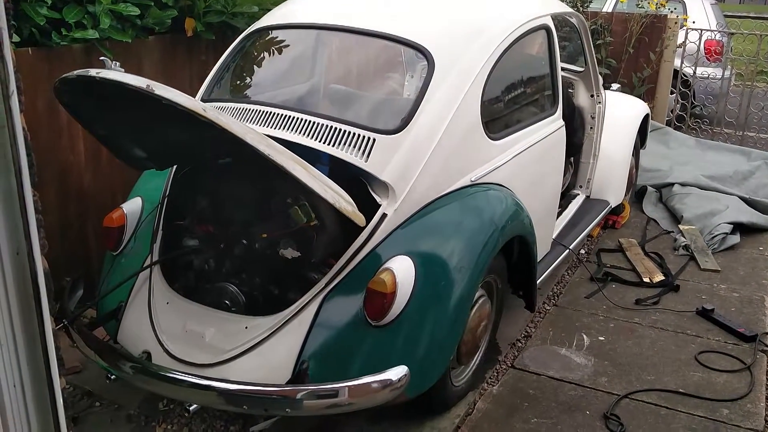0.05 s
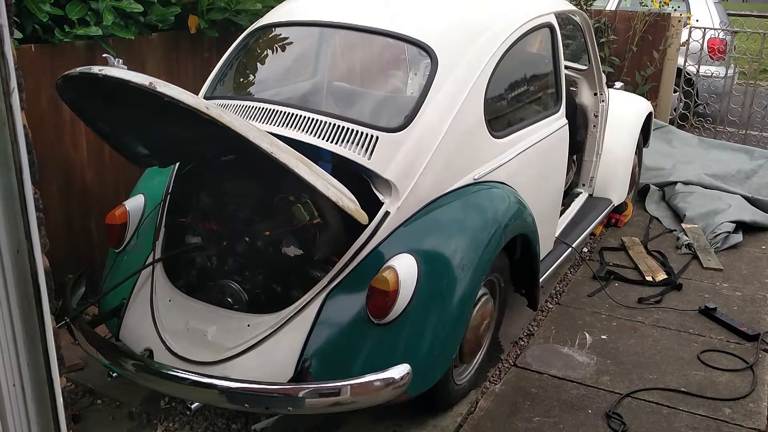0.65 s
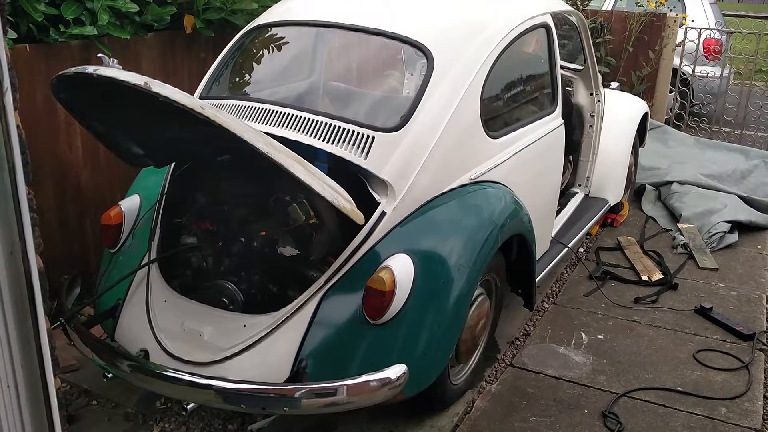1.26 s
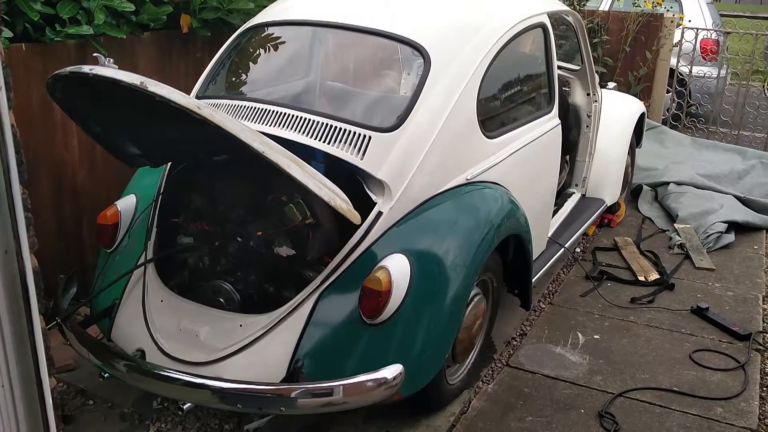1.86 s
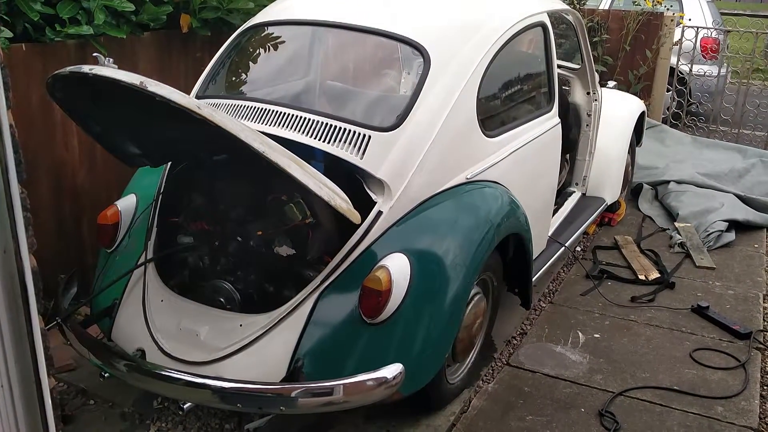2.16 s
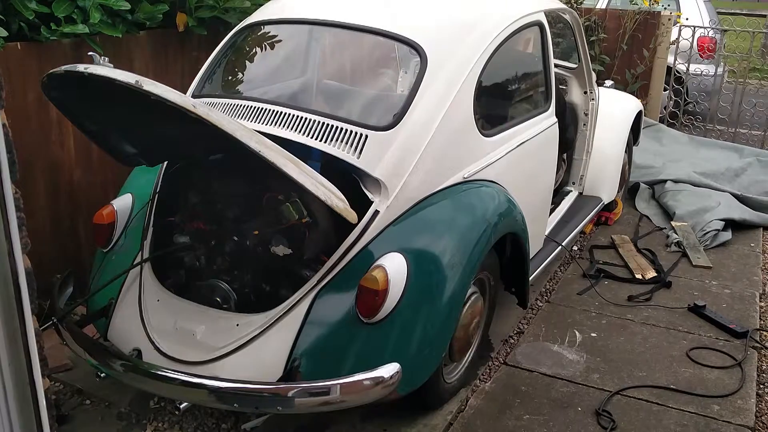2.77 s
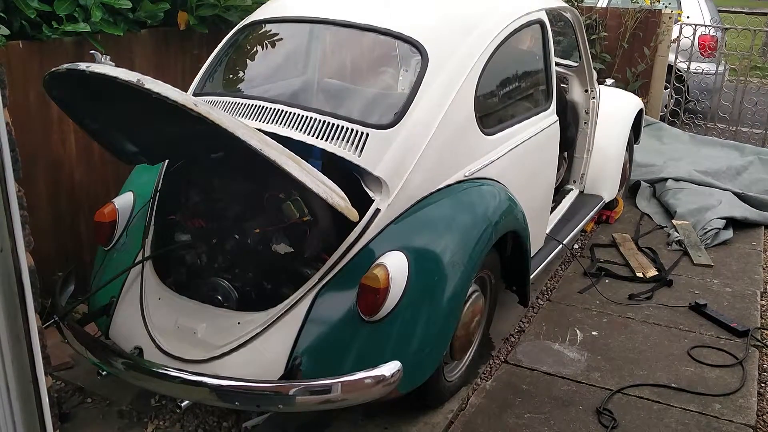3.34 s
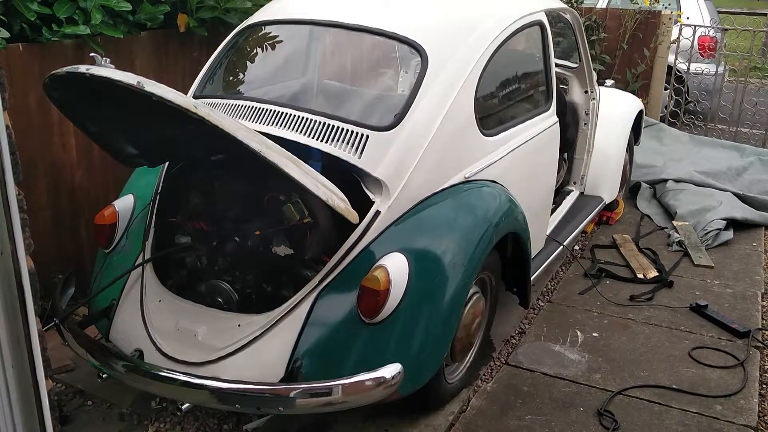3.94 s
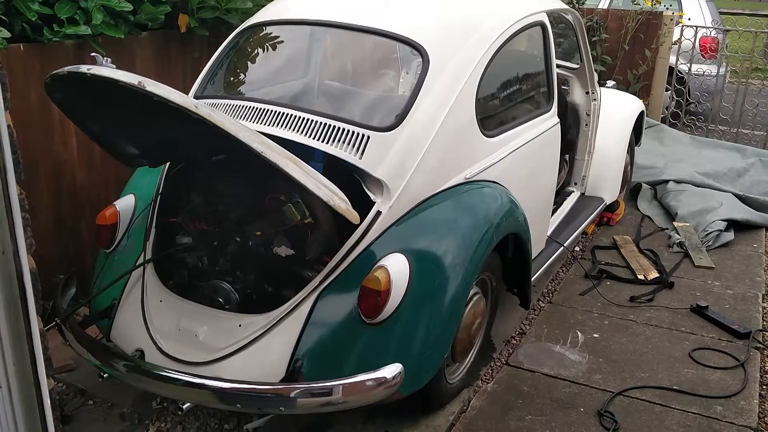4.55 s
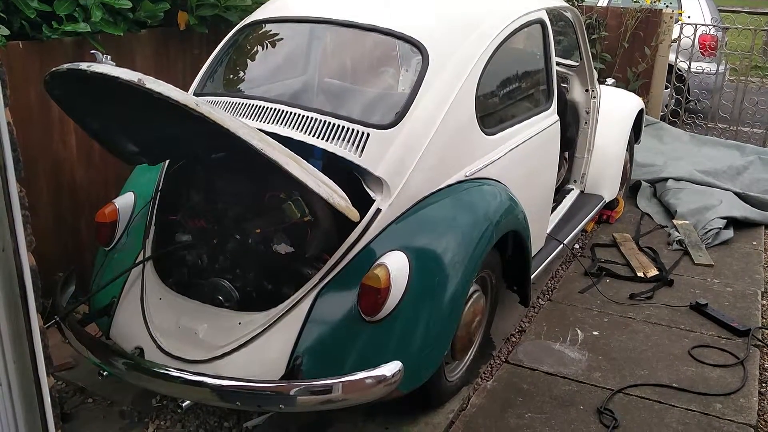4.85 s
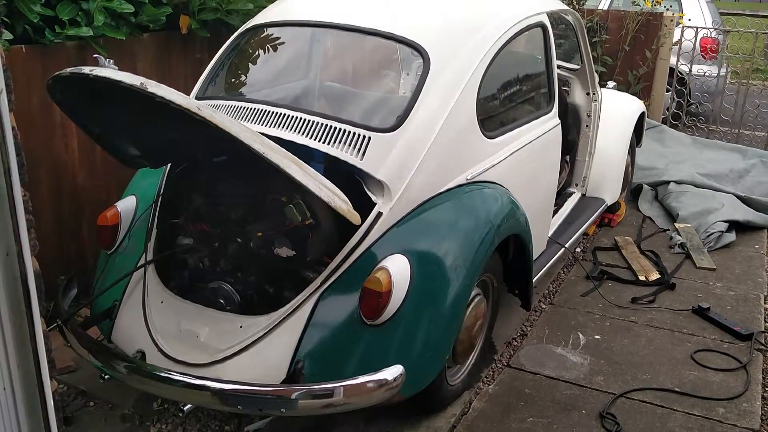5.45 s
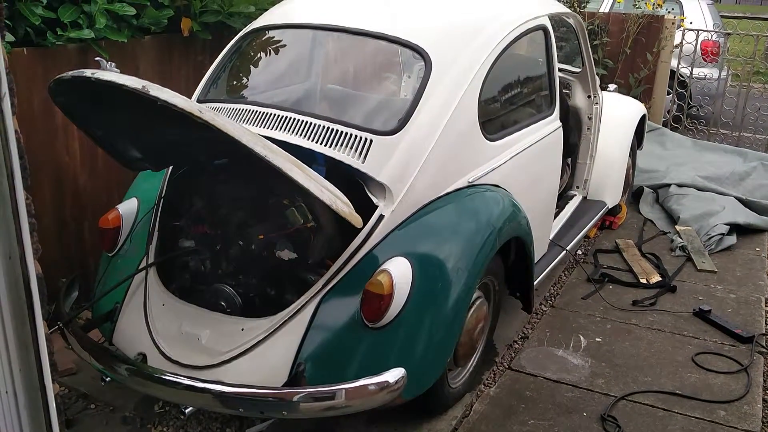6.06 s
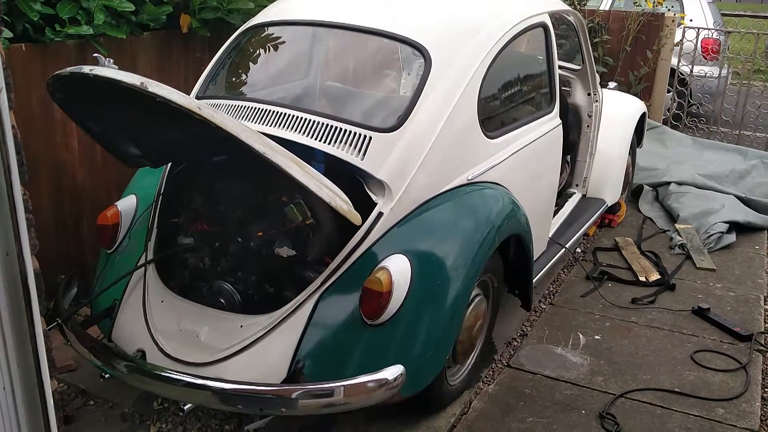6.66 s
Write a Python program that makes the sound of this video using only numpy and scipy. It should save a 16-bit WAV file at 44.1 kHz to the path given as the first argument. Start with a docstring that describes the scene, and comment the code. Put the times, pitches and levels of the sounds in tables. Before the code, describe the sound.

An old air-cooled car engine runs throughout, close by in a paved yard. Its exhaust is a dense, uneven, rasping throb. Slightly to the left, the cooling fan rushes and the valve gear clatters, with tinny ringing and occasional sharper ticks. A faint hollow intake hoot comes whenever the throttle opens.

The speed rises to a mild peak at about 0.7 seconds and sags by 1.4. It climbs slowly until 2.7, dips, and rises again at 3.4. The engine then runs lower, with small nudges of throttle, until about 4.5. Two sharper blips peak near 5.1 and 5.9 seconds: the engine races and its pulses merge into a growl, falling back after each. From about 6.3 seconds the speed is climbing again, still rising at the end, near 6.7 seconds.

```python
"""An air-cooled flat-four runs with its lid open in a paved yard. From the start the fan rushes, the
valve gear clatters through each cycle, and uneven firings ring the silencer and rasp from the tailpipes.
For over four seconds the throttle is worked up and down; the intake hoots whenever it is open.
Near five and six seconds come two blips: the engine races and the firings merge into a growl.
At the end the speed is climbing again."""
import sys
import numpy as np
from scipy import signal
from scipy.fft import rfft, irfft, next_fast_len
from scipy.io import wavfile
from scipy.ndimage import uniform_filter1d

SR = 44100
rng = np.random.default_rng(int(sys.argv[2]) if len(sys.argv) > 2 else 0)


def int16_out(signal):
    """Quantize to a 16-bit WAV file."""
    q = np.round(np.clip(np.atleast_2d(signal).T, -1, 1) * 32767)
    wavfile.write(sys.argv[1], SR, q.astype(np.int16))


N = 295911
T = np.arange(N) / SR
SIZE = next_fast_len(N + SR)
FREQ = np.arange(SIZE // 2 + 1) * SR / SIZE + 1e-6
FIRST_FIRING_CYCLES = -.06
BAY_PAN_DB = 8.5

# slow drifts of level: time_s, rattle_db, tinware_db, ticking_db, rasp_db
DRIFTS = [(0, 4, -8, -3.5, 0.5), (.22, 0, -11, -0.5, 2), (.8, -0.5, -3.5, 0, 2), (1.5, 0.5, -13, -0.5, 0.5),
          (2.2, 0, -6.5, 0.5, 2), (2.75, -1, -4, -1, 1), (3.05, 0, -8, -0.5, 1.5), (3.45, -2.5, -3.5, 1, 2),
          (3.62, -1.5, -5.5, 0, 1.5), (3.77, -4.5, -6, -5, -2.5), (3.95, -2, -5.5, -3.5, -0.5),
          (4.1, -4.5, -11.5, -5, 0), (4.22, -6, -8.5, -5.5, -4.5), (4.43, -6, -7.5, -4.5, -1.5),
          (4.55, -3.5, -9, -2.5, 2), (4.92, -3.5, -6, -1, 2), (5.25, -7, -6.5, -4.5, -1.5),
          (5.5, -4, -2.5, -3.5, 1), (5.9, -9.5, -7, -3, -1.5), (6.2, -3, -2.5, -2.5, 0.5),
          (6.71, -8.5, -6.5, -4, 1.5)]
# cylinders in firing order, at their most uneven: lag_cycles, strength_db
CYLINDERS = [(.001, -2), (-.067, -6.5), (0, 0), (-.066, -3.5)]
# presses of the throttle: opens_s, shuts_s, throb_gain_db, rise_s
THROTTLE = [(0.09, 0.81, -1.5, 0.0085), (1.186, 1.195, 4, 0.0081), (1.317, 2.785, -2, .045),
            (2.932, 3.455, -1.5, .012), (3.749, 3.766, 6, .012), (3.826, 4.3, -2.5, .012),
            (4.376, 5.095, -2, .02), (5.49, 5.894, -3, .012), (6.298, 6.8, -1.5, 0.0078)]


def undb(db):
    """Decibels as an amplitude ratio."""
    return 10 ** (np.asarray(db) / 20)


def curves(table):
    """The columns of a table, interpolated linearly in time."""
    time_s, *columns = np.transpose(table)
    return [np.interp(T, time_s, column) for column in columns]


def unit(x):
    """A signal or a response normalised to unit RMS."""
    return x / np.sqrt(np.mean(np.abs(x) ** 2))


def steady(x, span_s):
    """Division by the running RMS levels slow changes and keeps the faster beat."""
    power = np.mean(np.atleast_2d(x) ** 2, axis=0)
    size = int(span_s * SR)
    return x / np.sqrt(uniform_filter1d(uniform_filter1d(power, size), size) + 1e-12)


def filtered(x, response):
    """Linear filtering: the spectrum is multiplied by a frequency response."""
    return irfft(rfft(x, SIZE) * response, SIZE)[..., :N]


def colour(points):
    """A spectral envelope through (frequency_hz, level_db) points."""
    hz, db = np.transpose(points)
    return undb(np.interp(np.log(FREQ), np.log(hz), db))


def modes(table):
    """Superposition of damped resonators, each (pitch_hz, width_hz, level_db)."""
    return sum(undb(db) / (1 + 1j * (FREQ ** 2 - hz ** 2) / (FREQ * width)) for hz, width, db in table)


def noise(coherence):
    """Partly coherent stereo noise: a share of the power is common to both channels."""
    common = np.sqrt(coherence) * rng.standard_normal(N)
    return common + np.sqrt(1 - coherence) * rng.standard_normal((2, N))


def pan(x, db):
    """Direction by level difference, left minus right."""
    return x * undb([[db / 2], [-db / 2]])


def strikes(times, sizes):
    """An impulse train."""
    out = np.zeros(N)
    inside = (times > 0) & (times < T[-1])
    np.add.at(out, (times[inside] * SR).astype(int), sizes[inside])
    return out


def fade(x, decay_s):
    """Exponential decay of each impulse."""
    return signal.lfilter([1], [1, -np.exp(-1 / (decay_s * SR))], x)


def presses(shut_s=0.052):
    """Throttle opening (0-1), a row for each press: exponential rise, hold, linear fall."""
    return np.array([(1 - np.exp(-np.maximum(T - opens, 0) / rise))
                     * np.clip(1 - (T - shuts) / shut_s, 0, 1) for opens, shuts, _, rise in THROTTLE])


def running(cruise_hz=45, race_from_hz=51, race_full_hz=56.9):
    """Phase is the integral of rate: returns camshaft turns and the state (octaves, opening, racing)."""
    # engine speed: time_s, firing_hz
    speed = [(0.0, 38.132), (0.261, 40.213), (0.66, 50.658), (1.042, 43.176), (1.151, 34.087),
             (1.475, 32.044), (1.626, 37.771), (2.248, 49.452), (2.708, 51.834), (3.022, 38.923),
             (3.402, 52.062), (3.646, 39.879), (3.938, 35.665), (4.171, 40.968), (4.553, 33.589),
             (4.97, 61.839), (5.109, 64.699), (5.543, 46.41), (5.87, 62.6), (6.323, 42.458), (6.71, 55.692)]
    firing_hz, = curves(speed)
    cycle = .55 + np.cumsum(firing_hz) / SR / len(CYLINDERS)
    racing = np.clip((firing_hz - race_from_hz) / (race_full_hz - race_from_hz), 0, 1)
    return cycle, (np.log2(firing_hz / cruise_hz), presses().sum(axis=0), racing)


def gain(state, cruise_db, octave_db, open_db, race_db):
    """Amplitude follows a power law of speed, with further decibels for open throttle and for racing."""
    octaves, opening, racing = state
    return undb(cruise_db + octave_db * octaves + open_db * opening + race_db * racing)


def passes(cycle, place):
    """The times at which the camshaft passes one place in its turn."""
    return np.interp(np.arange(int(cycle[-1]) + 2) + place, cycle, T, left=-1, right=-1)


def firings(cycle, evenness, scatter_db, jitter_s):
    """A quasi-periodic pulse train: weak and early cylinders fall into line as evenness nears 1."""
    pulses = np.zeros(N)
    for k, (lag, db) in enumerate(CYLINDERS):
        place = k / len(CYLINDERS) + FIRST_FIRING_CYCLES
        lumpy = 1 - np.interp(passes(cycle, place), T, evenness)
        times = passes(cycle, place + lag * lumpy)
        timing, strength = rng.standard_normal((len(times), 2)).T
        pulses += strikes(times + jitter_s * timing, undb(db * lumpy + scatter_db * strength))
    return pulses


def yard():
    """Destructive interference: reflections from lid, fence and paving weaken a few narrow bands."""
    # notches: centre_hz, width_hz, depth_fraction
    nulls = [(430, 60, .15), (1025, 70, .15), (1400, 50, .15), (1785, 110, .25), (2590, 80, .35),
             (3085, 70, .2), (3820, 70, .28), (4015, 40, .2), (4180, 50, .25)]
    return np.prod([1 - depth * modes([(hz, width, 0)]) for hz, width, depth in nulls], axis=0)


def treble_dip(x, centre_hz=4460, width_hz=190):
    """A notch filter: a narrow dip opens in the treble and closes again."""
    # course of the notch: time_s, depth_fraction
    dip = [(0, 0), (3.5, 0), (4.3, 0.1), (5.3, 0.55), (6.71, 0)]
    depth, = curves(dip)
    return x - depth * filtered(x, modes([(centre_hz, width_hz, 0)]))


def fan(state):
    """Turbulence: cooling air rushes through the shroud as broadband noise, louder as the engine works."""
    # spectrum of the rush: frequency_hz, level_db
    spectrum = [(120, -17.5), (200, -21), (301, -40), (599, -17.5), (741, -9), (1060, -20.5), (1310, -14.5),
                (1820, -14.5), (2450, -11.5), (4410, -6), (6120, -6.5), (7330, -16), (8080, -31.5),
                (9210, -22.5), (10000, -45), (13000, -81.5), (22000, -120)]
    rattle_db, *_ = curves(DRIFTS)
    air = unit(filtered(noise(coherence=0.25), colour(spectrum)))
    air *= gain(state, -27.5, octave_db=4, open_db=2.77, race_db=3) * undb(rattle_db)
    return pan(air, 0.48 * BAY_PAN_DB)


def knock_envelopes(cycle, state, scatter_db=2.5, jitter_s=0.00045):
    """Incoherent impacts add in power: rockers and pushrods give envelopes of clatter and of ticking."""
    # knocks of one cycle: place_cycles, clatter_db, ticking_db, decay_s
    knocks = [(-.05, 1, 7, 0.002), (-.005, -6, 0, 0.0088), (0.182, -2, -4.5, 0.0037),
              (.275, -5.5, -11.5, 0.011), (0.422, -16, 2.5, 0.0035), (0.469, -6.5, -12, 0.0023),
              (0.655, -9.5, 0.5, 0.006), (0.788, -22, -9, 0.01)]
    # hardest clicks of a loose tappet: start_s, relative_db
    clicks = [(0.045, -17), (0.1456, -15), (0.345, -15), (0.602, -12), (0.685, -13), (2.4833, -8.5),
              (3.343, -7.5), (3.565, -13), (3.688, -16), (3.795, -16), (3.9045, -14), (3.953, -25),
              (4.066, -18.5), (4.118, -17), (4.1618, -15.5), (4.263, -13.5), (4.657, -9), (4.698, -17),
              (4.7505, -13.5), (4.8972, -13.5), (4.968, -14), (5.0972, -24), (5.223, -6), (5.2928, -15.5),
              (5.3626, -15), (5.438, -7), (5.6859, -13), (5.827, -8.5), (5.891, -12.5), (6.0267, -14.5),
              (6.105, -15.5), (6.181, -11), (6.2635, -14), (6.3518, -16), (6.6786, -20)]
    clatter, ticking = np.zeros(N), np.zeros(N)
    for place, clatter_db, ticking_db, decay_s in knocks:
        times = passes(cycle, place)
        timing, clatter_luck, tick_luck = rng.standard_normal((len(times), 3)).T
        times += jitter_s * timing
        clatter += fade(strikes(times, undb(clatter_db + scatter_db * clatter_luck) ** 2), decay_s / 2)
        ticking += fade(strikes(times, undb(ticking_db + scatter_db * tick_luck) ** 2), decay_s / 2)
    # reverberation: the bay and the fence keep the rattle going between knocks
    clatter += 0.039 * fade(clatter, decay_s=0.092) / (0.0038 * SR)
    ticking += 0.019 * fade(ticking, decay_s=0.0092) / (0.0057 * SR)
    clatter = steady(np.sqrt(clatter), span_s=0.86)
    ticking = steady(np.sqrt(ticking), span_s=0.33)
    clatter *= gain(state, -26.5 - 0.5, octave_db=6, open_db=0.56, race_db=1.5)
    ticking *= gain(state, -24.5 + 0.74, octave_db=8, open_db=0.5, race_db=1.5)
    _, _, drift_db, _ = curves(DRIFTS)
    click_s, click_db = np.transpose(clicks)
    tappet = fade(strikes(click_s, undb(click_db - 5.5)), decay_s=0.01)
    ticking = np.hypot(ticking * undb(drift_db), tappet)
    # a knock spreads through the casing for a few milliseconds before it peaks
    return uniform_filter1d(np.array([clatter, ticking]), size=280)


def valve_gear(cycle, state):
    """Impact excitation: each knock is a noise burst that rings the modes of covers and tinware."""
    # spectrum of the clatter: frequency_hz, level_db
    clatter_spectrum = [(900, -28), (1800, -26), (2200, 1.5), (2700, 2.5), (3300, 5), (4000, 6),
                        (4700, 4.5), (5600, 2.5), (7000, 1), (9000, -58.5)]
    # spectrum of the ticking: frequency_hz, level_db
    tick_spectrum = [(1500, -27.5), (3500, -44), (4600, -3), (5400, 4.5), (6300, 5.5), (6700, -5.5),
                     (7400, -12.5), (8000, -26), (9500, -23), (11000, -78)]
    # modes of the cooling tinware: pitch_hz, width_hz, level_db
    tinware = [(2179, 37, -6), (2205, 20, 2), (2216, 24, 1), (2358, 80, -2), (2457, 33, 5),
               (2488, 45, -4.5), (2710, 19, -8), (3000, 50, 0), (3140, 40, -2.5), (3486, 35, 2.5),
               (3573, 15, -7.5), (3695, 31, 0.5), (4090, 60, 5), (4920, 90, 15)]
    # modes of the rocker covers: pitch_hz, width_hz, level_db
    covers = [(4910, 22, -10), (5030, 26, -8.5), (5307, 22, -4.5), (5420, 22, -7), (5490, 26, -5),
              (5605, 26, -7), (5732, 22, -4.5), (5907, 22, -4), (6028, 22, -6), (6085, 26, -3),
              (6117, 24, .5), (6235, 26, -8), (6440, 60, -8)]
    rattle_db, tinware_db, *_ = curves(DRIFTS)
    knocking, ticking = knock_envelopes(cycle, state)
    clatter = undb(rattle_db) * filtered(noise(coherence=0.05) * knocking, unit(colour(clatter_spectrum)))
    # the harder knocks ring the tinware most
    hard_knocks = knocking * steady(knocking, span_s=0.17) ** 0.99
    tin = unit(modes(tinware) * colour([(900, 6.5), (2000, -3.5), (3600, 2.5), (7000, -27.5)]))
    clatter += undb(tinware_db - 1.16) * filtered(noise(coherence=0.89) * hard_knocks, tin)
    ticks = filtered(noise(coherence=0.04) * ticking, unit(colour(tick_spectrum)))
    ticks += filtered(noise(coherence=0.3) * ticking, unit(modes(covers) * colour(tick_spectrum)))
    return pan(clatter, 1.41 * BAY_PAN_DB) + pan(ticks * undb(-3), BAY_PAN_DB)


def intake(cycle, state):
    """Cavity resonance: each cylinder gulps air through the throttle and sounds the air cleaner."""
    # modes of the air cleaner: pitch_hz, width_hz, level_db
    cleaner = [(551, 19, 0), (572, 30, -12)]
    gulps = firings(cycle, evenness=np.ones(N), scatter_db=1.5, jitter_s=.0002)
    air = unit(gulps) + undb(5.5) * unit(fade(gulps, decay_s=0.0051) * noise(coherence=0.67))
    hoot = filtered(air, modes(cleaner) * colour([(250, -28), (480, 7.5), (640, 3.5), (1200, -15)]))
    hoot = steady(hoot, span_s=0.071) * gain(state, -56, octave_db=10, open_db=19, race_db=-1)
    return pan(hoot, db=-2.5)


def silencer():
    """Resonance and group delay: the pipes ring, and each chamber holds back sound near its own pitch."""
    # modes of silencer and tailpipes: pitch_hz, width_hz, level_db
    resonances = [(81.4, 16, -1.5), (119, 12.4, 2.5), (163.4, 12, 0), (177.1, 20.5, 4.5), (201, 37, -2.5),
                  (206.5, 23, -13.5), (257, 10.5, -1), (302, 34, -22.5), (336.6, 15, 0), (445, 52, -16)]
    # chambers that smear each pulse: pitch_hz, width_hz
    chambers = [(190, 88), (310, 122)]
    phase = sum(2 * np.angle(modes([(hz, width, 0)])) for hz, width in chambers)
    return modes(resonances) * np.exp(1j * phase)


def tailpipe_rasp(puffs, state):
    """Pulsed jet noise: the gas rasps, excites the hollow under the lid and barks under load."""
    # spectrum of the jet: frequency_hz, level_db
    spectrum = [(150, -37.5), (280, -2.5), (400, 0.5), (560, -4.5), (850, 1), (1060, -4.5), (1250, -3.5),
                (1550, -1.5), (1850, -1), (2600, 4), (6000, -69.5)]
    # modes of the lid and engine bay: pitch_hz, width_hz, level_db
    bay_modes = [(650, 50, -9), (758, 40, -4.5), (910, 40, -10), (1155, 45, -8), (1333, 45, -6),
                 (1472, 40, -8), (1630, 60, -9)]
    # modes of the tailpipes under load: pitch_hz, width_hz, level_db
    pipe_modes = [(291, 60, 4), (410, 85, -1.5), (1310, 150, -4), (1630, 100, -11), (2440, 360, 1.5)]
    jet = unit(filtered(noise(coherence=0.83) * (1 + puffs), colour(spectrum)))
    jet *= gain(state, -32.5, octave_db=4, open_db=1.34, race_db=1.5)
    under_lid = modes(bay_modes) * colour([(200, -12), (500, -0.5), (1800, 4.5), (4000, -14)])
    hollow = unit(filtered(noise(coherence=0.93) * (1 + puffs), under_lid))
    hollow *= gain(state, -42, octave_db=6.5, open_db=3, race_db=3)
    pipes = modes(pipe_modes) * colour([(150, -24), (280, -2), (3200, 3), (6000, -35)])
    bark = unit(filtered(noise(coherence=1) * (puffs + 0.067), pipes))
    bark *= gain(state, -46, octave_db=7.5, open_db=4.5, race_db=9)
    *_, rasp_db = curves(DRIFTS)
    return pan((jet + hollow + bark) * undb(rasp_db), db=-2)


def rumble(puffs, state):
    """Amplitude modulation: the low noise of the gas flow swells with each puff."""
    spectrum = [(25, -33), (45, -12.5), (70, -7.5), (130, 1.5), (300, -5), (420, -8), (900, -55.5)]
    flow = unit(filtered(rng.standard_normal(N) * (1 + puffs), colour(spectrum)))
    return pan(flow * gain(state, -37.3, octave_db=2, open_db=1.2, race_db=2.5), db=-1)


def pumping(firing_phase, state):
    """Periodic flow: the smooth part of the gas stream hums at three harmonics of the firing rate."""
    odd = undb(3.5) * np.cos(firing_phase) + undb(-5) * np.cos(3 * firing_phase)
    odd *= gain(state, -53, octave_db=35.5, open_db=2, race_db=6)
    second = np.cos(2 * firing_phase) * gain(state, -42.5, octave_db=-9.5, open_db=9, race_db=11)
    return pan(odd + second, db=-0.9)


def growl(firing_phase, state, waver_db=2.2):
    """Engine orders: racing under load, the firings merge into wavering partials that follow the speed."""
    # partials: ratio_to_firing_rate
    ratios = [1.75, 2, 2.5, 3, 4.25, 4.5, 5]
    # strength of each partial: relative_db
    levels = [-19, -3, -3, -5.5, -10, -19.5, -13]
    _, opening, racing = state
    waver_band = modes([(20, 18, 0)]) ** 2
    partials = np.zeros(N)
    for ratio, db in zip(ratios, levels):
        waver = unit(filtered(rng.standard_normal(N), waver_band))
        partials += undb(db + waver_db * waver) * np.cos(ratio * firing_phase)
    return pan(partials * racing * opening * undb(-21), db=-1.1)


def exhaust(cycle, state):
    """Source and filter: gas pulses ring the silencer, each trailed by a turbulent puff."""
    _, opening, racing = state
    evenness = np.clip(0.72 * racing + 0.8 * (1 - opening), 0, 1)
    pulses = firings(cycle, evenness, scatter_db=1, jitter_s=.00012)
    puffs = fade(pulses, decay_s=0.0038)
    gas = unit(pulses) + undb(-14) * unit(puffs * rng.standard_normal(N))
    outlet = colour([(30, -26), (70, -12.5), (110, 12.5), (260, 2.5), (400, -9.5), (800, -22),
                     (1500, -20), (4000, -45)])
    throb = steady(filtered(gas, silencer() * outlet), span_s=0.078)
    throb *= gain(state, -38.5 + 3.5, octave_db=3, open_db=11, race_db=1)
    press_db = np.array(THROTTLE)[:, 2] @ presses()
    merge_db = -3 * racing * opening  # separate pulses give way to the growl
    throb *= undb(press_db + merge_db - 1.3 * evenness)
    turbulence = tailpipe_rasp(puffs, state) + rumble(puffs, state)
    firing_phase = 2 * np.pi * len(CYLINDERS) * (cycle - FIRST_FIRING_CYCLES)
    tones = pumping(firing_phase, state) + growl(firing_phase, state)
    # the tones leave through the same pipes and take on their phase shift
    tones = filtered(tones, np.exp(1j * np.angle(silencer())))
    return pan(throb, db=-1) + turbulence + tones


def scene(left_delay_s=.00008):
    """Superposition: speed and throttle drive all sources, and the sound reaches the left side later."""
    cycle, state = running()
    bay = treble_dip(valve_gear(cycle, state) + fan(state))
    engine = bay + exhaust(cycle, state) + intake(cycle, state)
    arrival = np.exp(-2j * np.pi * FREQ * np.array([[left_delay_s], [0]]))
    return filtered(engine, yard() * arrival)


def record(dry, ceiling=.9, cutoff_hz=9950):
    """Soft saturation rounds the highest peaks; a steep low-pass cuts the top end."""
    rounded = ceiling * np.tanh(dry / ceiling)
    return signal.sosfilt(signal.ellip(10, .2, 80, cutoff_hz, fs=SR, output="sos"), rounded)


dry = scene()
out = record(dry)
int16_out(out)
```